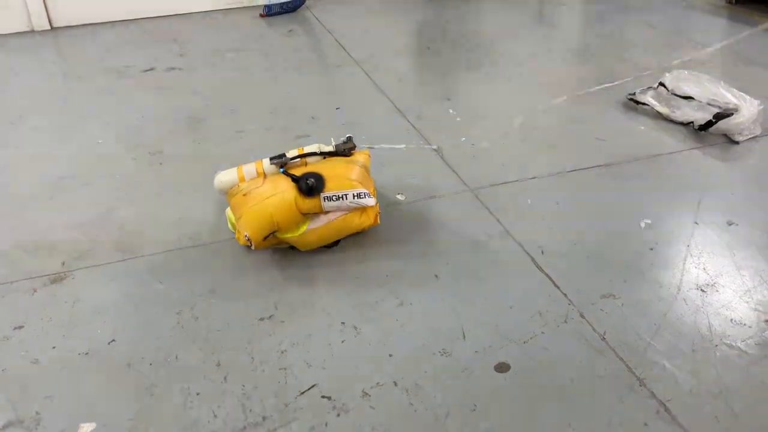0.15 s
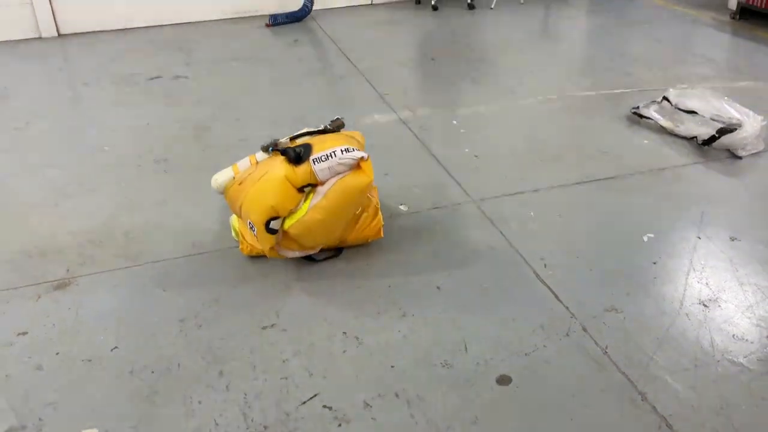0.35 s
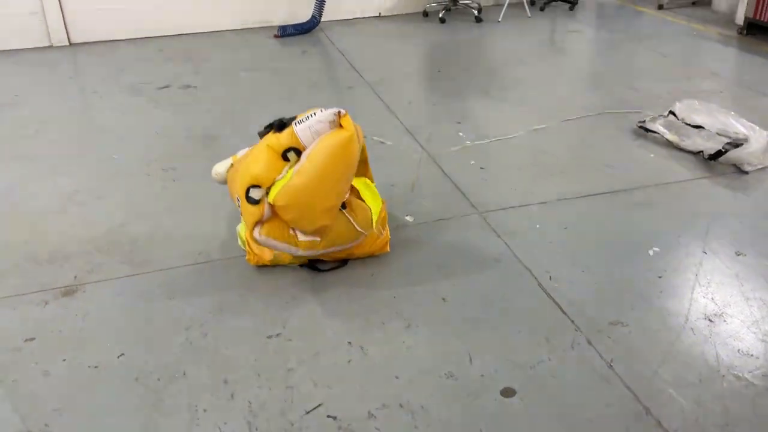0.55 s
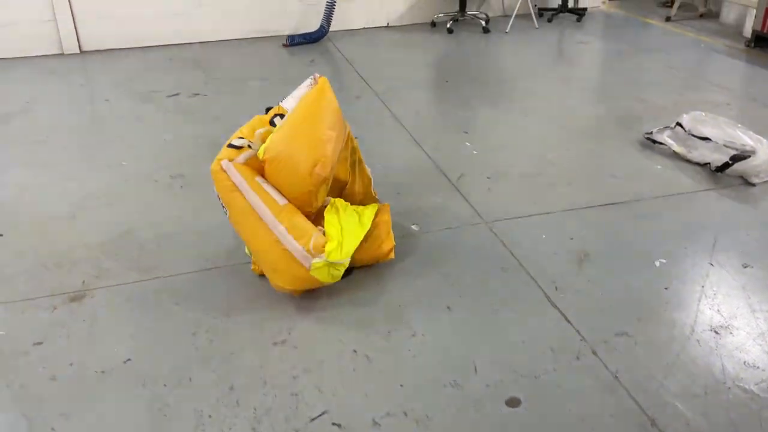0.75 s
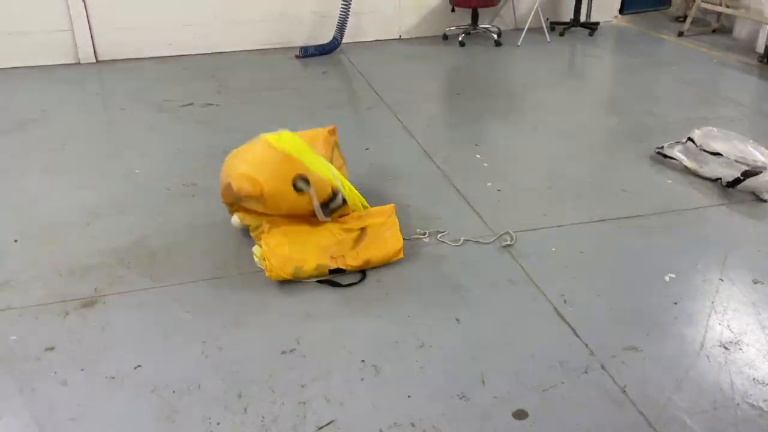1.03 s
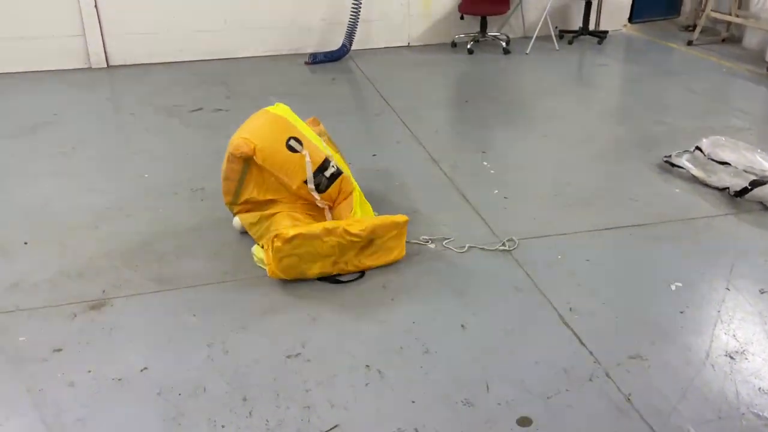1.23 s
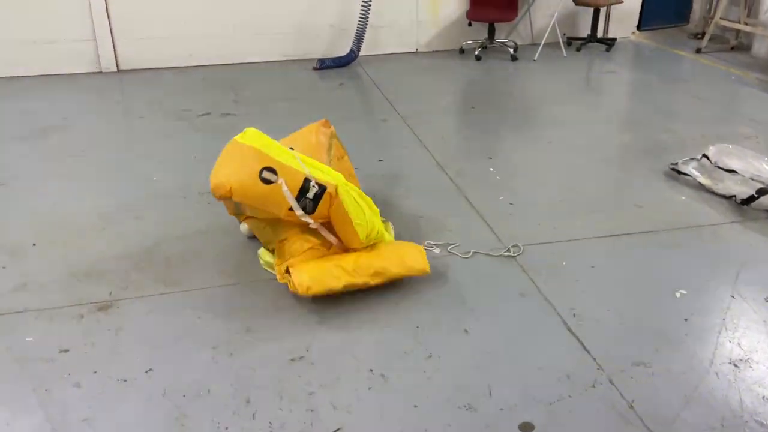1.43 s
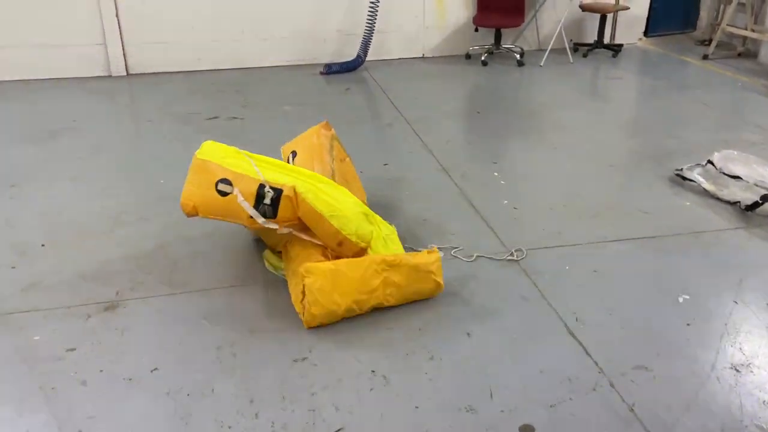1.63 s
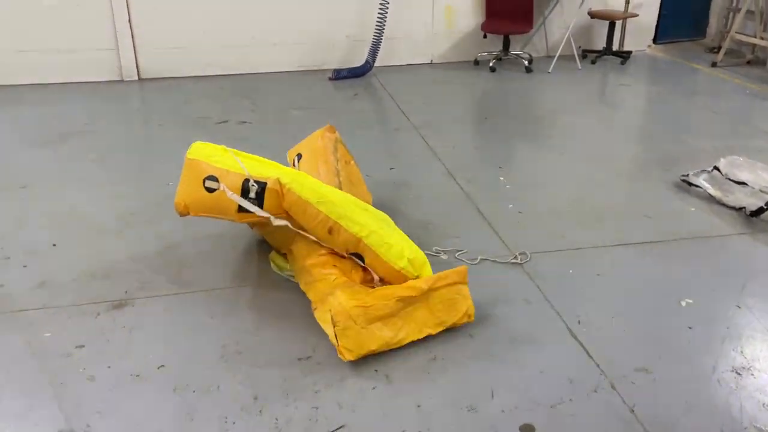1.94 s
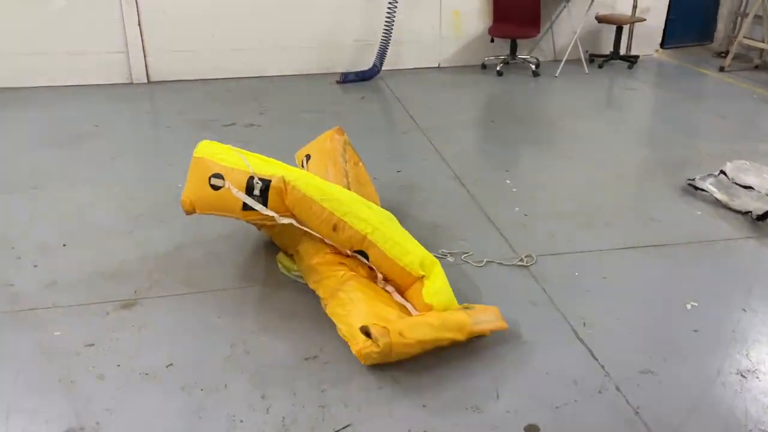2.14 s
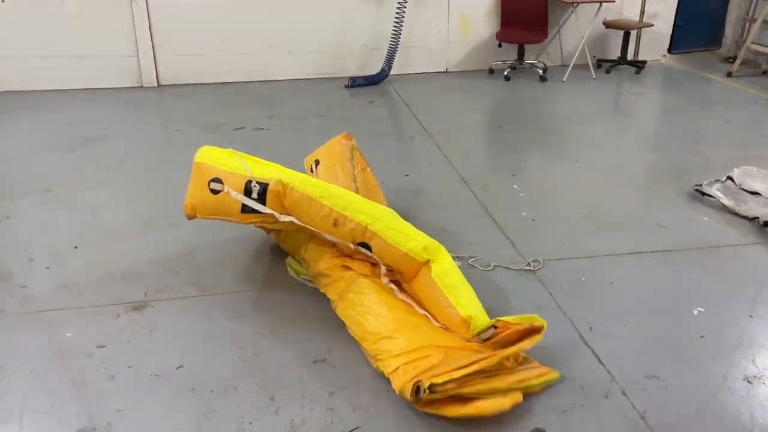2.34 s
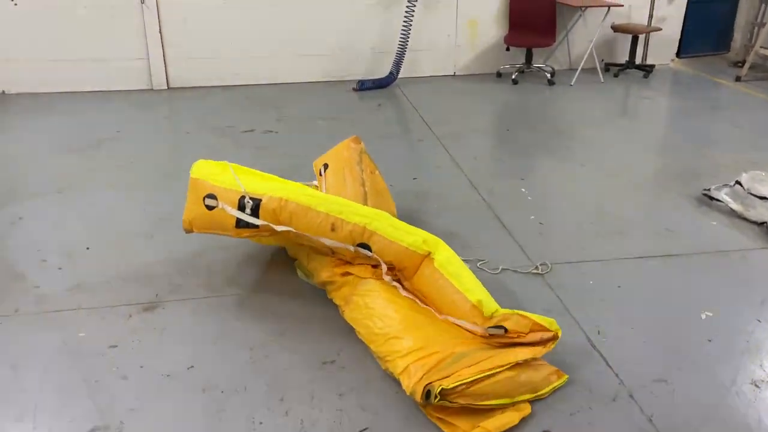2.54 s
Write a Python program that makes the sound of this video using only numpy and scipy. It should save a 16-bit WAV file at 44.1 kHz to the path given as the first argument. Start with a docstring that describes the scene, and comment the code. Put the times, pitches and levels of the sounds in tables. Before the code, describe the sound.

Compressed gas blasts and roars into an inflating liferaft, which flops onto a hard workshop floor

```python
"""A valve snaps open and gas roars into a packed liferaft on a concrete workshop floor, with a first hard blast.
Shaped noise makes the roar, hiss and sizzle; the hiss fades with the pressure, and a low sine throb runs along.
Short noise rasps mark the opening folds; the raft flops down, booming during the landing, and scuffs the floor.
Narrow resonances sound hollow; close reflections colour the noise layers for two microphone ports."""
import sys
import numpy as np
from scipy import signal
from scipy.fft import rfft, irfft, next_fast_len
from scipy.io import wavfile
from scipy.ndimage import map_coordinates

SR = 44100
rng = np.random.default_rng(int(sys.argv[2]) if len(sys.argv) > 2 else 0)


def persist_wave(psi):
    """Save psi, clipped to +-1, as 16-bit WAV."""
    counts = np.round(np.clip(psi, -1, 1) * 32767).astype(np.int16)
    wavfile.write(sys.argv[1], SR, np.atleast_2d(counts).T)


N = 118188  # length in samples


def amp(db):
    """Turn decibels into gain."""
    return 10 ** (np.asarray(db) / 20)


def unit(x):
    """Scale to an rms (average strength) of 1."""
    return x / np.sqrt(np.mean(x ** 2) + 1e-20)


def along(points, hz, axis=1):
    """Read one column of a frequency table, with frequency on a log axis."""
    table = np.transpose(points)
    return np.interp(np.log(hz + 1), np.log(table[0] + 1), table[axis])


def since(start_s):
    """Seconds elapsed after a start time, zero before it."""
    return np.maximum(np.arange(N) / SR - start_s, 0)


def rise(t, time_s):
    """Climb from 0 towards 1, quickly at first."""
    return 1 - np.exp(-t / time_s)


def fall(t, time_s):
    """Die away from 1 towards 0, quickly at first."""
    return np.exp(-t / time_s)


def wobble(rate):
    """A smooth random curve through `rate` random points a second."""
    points = rng.standard_normal(int(N * rate / SR) + 4)
    return map_coordinates(points, [np.arange(N) * rate / SR])


def filtered(x, response):
    """Reshape the spectrum of x by a response that depends on frequency."""
    size = next_fast_len(N + SR // 4)
    hz = np.fft.rfftfreq(size, 1 / SR)
    return irfft(rfft(x, size) * response(hz), size)[..., :N]


def centred(shape, centre_hz):
    """Place a spectrum shape on a centre frequency."""
    return [(multiple * centre_hz, db) for multiple, db in shape]


WALLS_DB, FIRST_S, LAST_S = -12.5, 0.00078, 0.036  # strength; first and last arrival
WALLS_LOW_HZ = 700


def walls(x):
    """Close surfaces return a weak, dense cluster of early reflections, which ripples the upper spectrum."""
    t = np.arange(SR // 10) / SR
    strength = np.interp(t, [0, FIRST_S, LAST_S], [0, 1, 0]) * (t > FIRST_S)
    echoes = rng.standard_normal(len(t)) * strength
    b, a = signal.butter(2, WALLS_LOW_HZ, 'high', fs=SR)
    echoes = signal.lfilter(b, a, echoes)
    echoes = echoes[None] / np.linalg.norm(echoes)
    return x + amp(WALLS_DB) * signal.fftconvolve(x, echoes, axes=1)[:, :N]


# How the two ports hear the noise: pitch_hz, likeness (0-1), left_lead_radians
PORTS = [(60, 0.99, 0.0), (350, 0.73, 0.0), (700, 0.49, 0.3), (1100, 0.43, 0.7), (1700, 0.08, 0.4),
         (2300, 0.46, 0.3), (3100, 0.58, 1.7), (3800, 0.25, 2.8), (4400, 0.41, 5.9), (5200, 0.17, 8.5),
         (6200, 0.61, 11.4), (6700, 0.56, 12.3), (7200, 0.26, 9.6), (7700, 0.77, 9.8), (8700, 1.0, 9.4),
         (10500, 0.72, 8.3), (12800, 0.99, 6.3)]
# Left level minus right level: pitch_hz, difference_db
BALANCE = [(60, 6), (130, -1), (290, 0), (640, 1.5), (1410, 1), (3100, -1), (6820, -0.5), (15000, 0)]


def at_ports(pair, spectrum):
    """Two nearby ports hear partly alike: blend unrelated signals into left and right, rms 1."""
    def shares(hz):
        angle = np.arccos(np.clip(along(PORTS, hz), 0, 1)) / 2
        return amp(along(spectrum, hz)) * [np.cos(angle), np.sin(angle)]

    half = np.array([[.5], [-.5]])  # each side takes half the difference

    def sides(hz):
        gain = amp(half * along(BALANCE, hz))
        return gain * np.exp(1j * half * along(PORTS, hz, axis=2))

    common, opposite = filtered(pair, shares)
    left_right = np.array([common + opposite, common - opposite])
    return unit(filtered(left_right, sides))


def rush(spectrum):
    """Turbulent gas or rubbing cloth: stereo noise with reflections and a given spectrum, rms 1."""
    return at_ports(walls(rng.standard_normal((2, N))), spectrum)


def quiet():
    """The workshop's faint background is steady noise, mostly low."""
    return amp(-90) * rush([(40, -1), (200, -14), (1000, -25), (10000, -48)])


# Fabric dragging over the floor: start_s, length_s, level_db (at full swell), centre_hz
DRAGS = [(1.34, 0.39, -30.5, 397), (1.867, 0.089, -28.5, 760), (1.89, 0.086, -34, 1360),
         (2.04, 0.084, -28.5, 570), (2.06, 0.15, -38, 1240), (2.3, 0.13, -40, 1000),
         (2.41, 0.15, -29.5, 960), (2.517, 0.16, -30.5, 375)]
# Drag spectrum: multiple of the centre, relative_db (per Hz)
DRAG_SHAPE = [(.1, -35), (.5, -17), (.8, 4.5), (1.15, 6.5), (1.7, -6), (4, -30), (12, -50)]


def drags(rough_db=1.0):
    """Unrolling fabric scuffs along the floor in short, uneven swells of noise."""
    roughness = amp(rough_db * wobble(110))
    out = np.zeros((2, N))
    for start_s, length_s, db, hz in DRAGS:
        swell = np.sin(np.pi * np.minimum(since(start_s) / length_s, 1))
        out += amp(db) * swell * rush(centred(DRAG_SHAPE, hz))
    return roughness * out


BOOM_S, BOOM_DB, BOOM_DECAY_S = 1.06, -26, 0.15  # start; level before the envelope; decay
# Boom spectrum: pitch_hz, relative_db (per Hz)
BOOM = [(60, -14), (110, -16), (138, 16), (170, 4), (200, -8), (260, 7.5), (350, -12), (900, -35)]


def boom(rise_s=0.009):
    """The half-filled tube booms briefly during the landing: low noise swells and dies away."""
    t = since(BOOM_S)
    return amp(BOOM_DB) * rise(t, rise_s) * fall(t, BOOM_DECAY_S) * rush(BOOM)


FLOP_RISE_S, FLOP_DECAY_S = 0.0016, 0.01
FLOP_TAIL_DB, FLOP_TAIL_S = -14.5, 0.07  # tail relative to the slap; its decay
# Raft landing on the floor: start_s, level_db (before the envelope), centre_hz
FLOPS = [(1.007, -15.5, 480), (1.026, -15.5, 760), (1.036, -16, 620), (1.06, -19.5, 900), (1.087, -19, 520),
         (1.095, -22.5, 190)]
# Flop spectrum: multiple of the centre, relative_db (per Hz)
FLOP_SHAPE = [(.08, -24), (.25, -8), (.55, -4.5), (1, -0.5), (1.5, -2), (2.6, -14), (8, -44), (20, -70)]


def flops():
    """Fabric slaps dully on concrete: noise bursts, each with its own depth and a short room tail."""
    out = np.zeros((2, N))
    for start_s, db, hz in FLOPS:
        t = since(start_s)
        decay = fall(t, FLOP_DECAY_S) + amp(FLOP_TAIL_DB) * fall(t, FLOP_TAIL_S)
        out += amp(db) * rise(t, FLOP_RISE_S) * decay * rush(centred(FLOP_SHAPE, hz))
    return out


OPEN_S, ATTACK_S = .084, 0.00082


def valve():
    """The valve snaps open and stays open, so the flow quickly reaches full strength."""
    return rise(since(OPEN_S), ATTACK_S)


RING_DB = -37.5  # all resonances together
# Hollow resonances: pitch_hz, width_hz, relative_db
RINGS = [(183, 8.6, -2), (262.4, 7.5, -1), (373, 16, -0.5), (404.6, 4.2, -3.5), (617, 9.2, -2),
         (921, 10, -4)]


def hollow():
    """Turbulence drives a few narrow resonances of the tubes and the room."""
    def body(hz):
        total = 0
        for centre, width, db in RINGS:
            damping = 1j * hz * width
            resonance = damping / (centre * centre - hz * hz + damping)
            total = total + amp(db) / np.sqrt(abs(width)) * resonance  # even out the widths
        return total

    return amp(RING_DB) * valve() * unit(filtered(rng.standard_normal(N), body))


THROB_HZ, THROB_SETTLE_S = 23.45, 0.32
# Partials of the throb: multiple, steady_level_db, extra_opening_db
THROB = [(2, -38.5, 8.5), (3, -44.5, 13.5), (5, -55, 19), (8, -47, 12)]


def throb(drift=0.22, waver_db=-0.45):
    """The flow pulsates: low sine partials start stronger, settle, and waver in phase and level."""
    t = since(OPEN_S)
    out = np.zeros(N)
    for multiple, db, extra_db in THROB:
        phase = 2 * np.pi * (multiple * THROB_HZ * t + rng.random()) + drift * wobble(4.2)
        level_db = db + extra_db * fall(t, THROB_SETTLE_S) + waver_db * wobble(4.96)
        out += amp(level_db) * np.sqrt(2) * np.sin(phase)
    return valve() * out


SURGE_RISE_S, SURGE_FALL_S = 0.0032, 0.0074
# Surges of gas as folds give way: start_s, length_s (until the fall), level_db
SURGES = [(.188, .04, -22), (.335, .04, -30), (.432, .037, -22.5), (.565, .066, -25.5), (.775, .055, -30)]
# Surge spectrum: pitch_hz, relative_db (per Hz)
SURGE = [(150, -7), (800, -7), (1700, -7), (2600, 4), (3300, 4), (4300, -14), (8000, -22), (15000, -44)]


def surges():
    """Each opening fold lets through a short rasp of gas, which rises, holds and falls."""
    level = np.zeros(N)
    for start_s, length_s, db in SURGES:
        ending = fall(since(start_s + length_s), SURGE_FALL_S)
        level += amp(db) * rise(since(start_s), SURGE_RISE_S) * ending
    return level * rush(SURGE)


BLAST_END_S, BLAST_DB, BLAST_FALL_S = 0.22, -20, 0.0094  # the pack splits open at the end time
# Blast spectrum: pitch_hz, relative_db (per Hz)
BLAST = [(100, -11), (160, -1), (280, -6), (630, -3.5), (1000, 3), (1350, -3), (1650, 3), (2200, -3.5),
         (3100, -2.5), (4300, -10), (8000, -11), (15000, -37)]


def blast():
    """Gas pounds into the tight pack and drops back as soon as it has room."""
    return amp(BLAST_DB) * valve() * fall(since(BLAST_END_S), BLAST_FALL_S) * rush(BLAST)


GUST_DB = .18  # slow unrest
# Spectra of the three jet layers: pitch_hz, relative_db (per Hz)
ROAR = [(35, -34), (58, -10), (85, -6.5), (110, -6.5), (160, -4), (215, -4), (310, -4.5), (420, -2),
        (520, 0), (700, 0.9), (1000, -1), (1500, -1.3), (2300, -6.5), (3000, -7.5), (4100, -9),
        (5100, -14.5), (5600, -17.5), (6300, -16.5), (7000, -17.5), (8000, -21.5), (10000, -36),
        (12500, -40.5), (15000, -53)]
HISS = [(350, -47), (900, 2), (1400, -4), (2000, 0.5), (3100, 1), (3600, -2), (4200, -3.5), (5200, -1),
        (5500, -6.5), (6000, -4.5), (7400, -11.5), (8000, -7), (10000, -59), (12500, -31), (15000, -36)]
SIZZLE = [(5000, -21), (8000, -50), (9500, 13.5), (12500, 2), (14000, 1), (15000, -11)]
# Their levels over time, before the shared unrest: time_s, level_db
ROAR_LEVEL = [(.08, -23), (.28, -23), (.42, -20), (.63, -20.3), (.78, -20), (.88, -21.5), (1.15, -21),
              (1.5, -21.5), (1.8, -21.5), (2.2, -22), (2.68, -22.5)]
HISS_LEVEL = [(.08, -20), (.36, -19.5), (.58, -22.3), (.72, -25), (1.15, -26), (1.7, -31), (2.68, -32.5)]
SIZZLE_LEVEL = [(.08, -33.5), (.2, -36), (.45, -39), (.9, -43.5), (1.35, -43), (1.7, -47), (1.98, -48.5),
                (2.12, -45), (2.32, -44), (2.5, -47), (2.68, -47)]


def jet(flutter_db=0.5):
    """Gas makes a lasting roar in the tubes, a hiss that dies with the pressure, and a fine top sizzle."""
    unrest_db = GUST_DB * wobble(11.4) + flutter_db * wobble(90)
    out = np.zeros((2, N))
    for level, spectrum in [(ROAR_LEVEL, ROAR), (HISS_LEVEL, HISS), (SIZZLE_LEVEL, SIZZLE)]:
        time_s, level_db = np.transpose(level)
        out += amp(np.interp(since(0), time_s, level_db)) * rush(spectrum)
    return valve() * amp(unrest_db) * out


def scene():
    """Add all sources over the quiet of the workshop."""
    landing = drags() + boom() + flops()
    gas = hollow() + throb() + surges() + blast() + jet()
    return quiet() + landing + gas


TOP_HZ, TOP_EDGE_HZ = 15400, 500  # band limit; width of the fade below it


def record(dry):
    """The recorder drops the deepest bass and everything above its band limit."""
    b, a = signal.butter(4, 36, 'high', fs=SR)
    without_bass = signal.lfilter(b, a, dry)
    return filtered(without_bass, lambda hz: np.clip((TOP_HZ - hz) / TOP_EDGE_HZ, 0, 1))


dry = scene()
out = record(dry)
persist_wave(out)
```